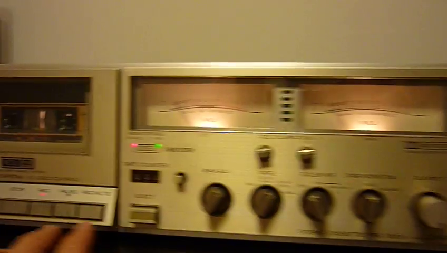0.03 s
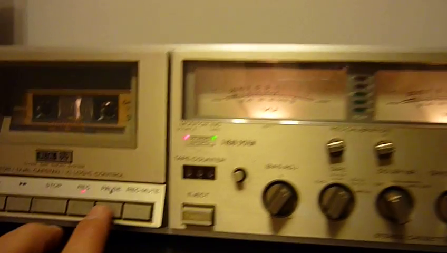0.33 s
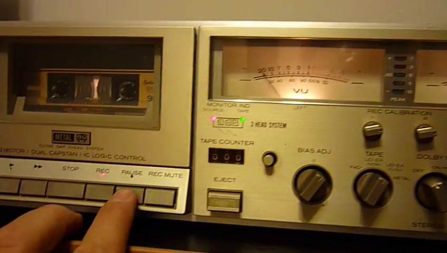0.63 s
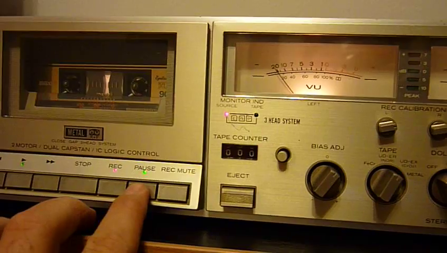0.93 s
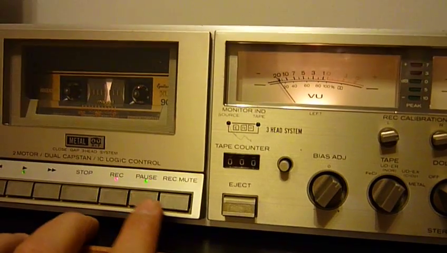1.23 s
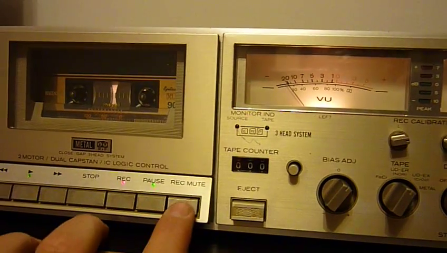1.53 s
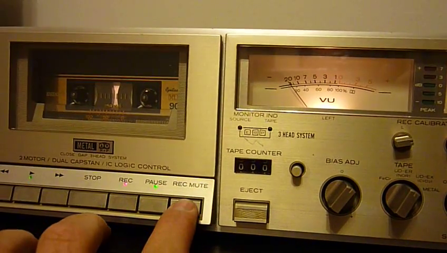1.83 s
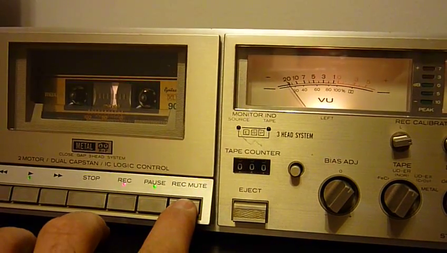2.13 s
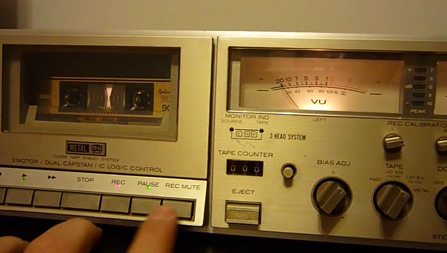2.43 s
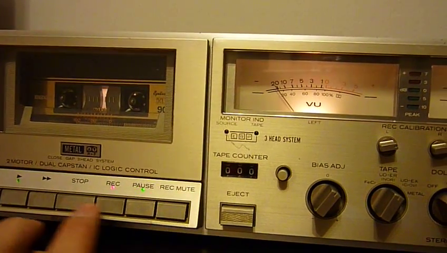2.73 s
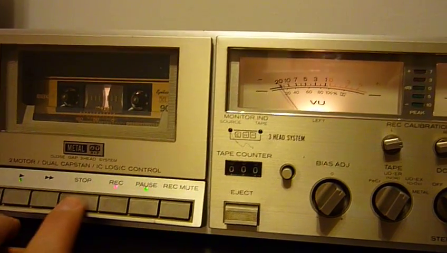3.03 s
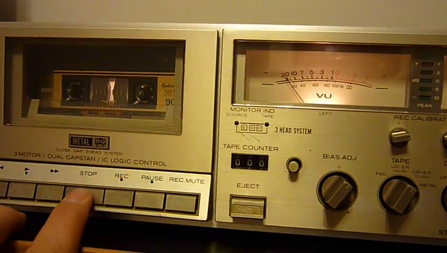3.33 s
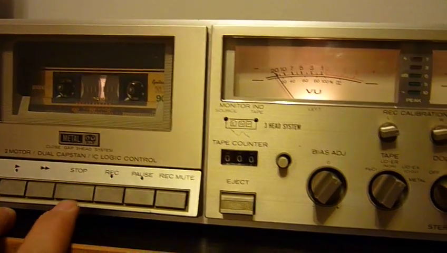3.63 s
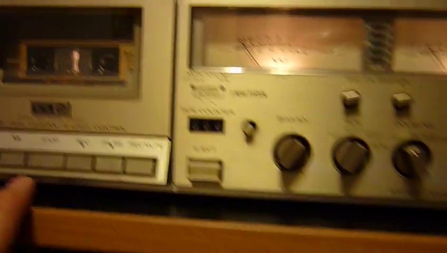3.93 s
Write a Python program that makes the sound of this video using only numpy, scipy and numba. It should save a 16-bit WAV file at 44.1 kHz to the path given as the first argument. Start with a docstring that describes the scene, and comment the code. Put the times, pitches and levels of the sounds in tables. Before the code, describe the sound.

A tape deck clunks into action, then its buttons click over a low hum and hiss.

```python
"""A cassette deck in a small room, close to a pocket camera; its motor hums over steady hiss throughout.
At 0.66 s a button clicks and fires the solenoid: levers rattle the chassis, a steel latch snaps home.
The camera's gain sinks after this clunk and creeps back.
From 1.1 s to 3.6 s further presses only click, each a switch spring and a plastic key."""
import sys
import numpy as np
from scipy import signal
from scipy.fft import rfft, irfft
from scipy.io import wavfile
from numba import njit

SR = 44100
rng = np.random.default_rng(int(sys.argv[2]) if len(sys.argv) > 2 else 0)


def waveform_to_disk(signal):
    """Save audio, clipped to [-1, 1], as 16-bit WAV at the path in sys.argv[1]."""
    frames = np.transpose(np.atleast_2d(signal))
    scaled = np.clip(frames, -1, 1) * 32767
    samples = np.round(scaled).astype(np.int16)
    wavfile.write(sys.argv[1], SR, samples)


N = 176400


def transport():
    """The solenoid's clunk: levers strike, the chassis rings on, the latch snaps."""
    blows = levers()
    return blows + chassis(blows) + latch()


def levers():
    """Each lever lands in a burst of tiny contacts: low thud, mid clack, grainy rattle."""
    # Each row: start in seconds, thud, clack and rattle levels in dB, rise and base decay in seconds.
    strikes = [(0.772, -45.5, -44, -43.5, .0005, 0.0073), (0.7904, -34.5, -23, -22.5, 0.0023, 0.0047),
               (0.7992, -43, -22.5, -20.5, 0.0015, .005), (0.8454, -34, -27.5, -26.5, 0.0064, 0.0053),
               (0.861, -42, -27, -36, .002, .011), (0.8811, -38, -24, -34.5, 0.0047, .006),
               (0.8955, -41.5, -46.5, -41.5, .002, 0.013), (0.9419, -43.5, -26, -22.5, 0.0028, 0.0093),
               (0.9578, -43, -22, -22.5, 0.00052, 0.0052)]
    grain = amp(2.5 * walk(rate_hz=660))
    grain /= np.sqrt(np.mean(grain ** 2))
    thud = band(low_hz=333, high_hz=605)
    # Each row: centre in Hz, width in Hz, relative level in dB.
    lever_resonances = [(534, 260, -6), (897, 280, -3.5), (1250, 260, 4.5), (1550, 450, -1), (2180, 340, 0)]
    clack = resonant_noise(lever_resonances)
    rattle = band(low_hz=2730, high_hz=5370) * grain
    out = np.zeros(N)
    for start_s, thud_db, clack_db, rattle_db, rise_s, decay_s in strikes:
        out += amp(thud_db) * thud * burst(start_s, rise_s, 2.33 * decay_s)
        out += (amp(clack_db) * clack + amp(rattle_db) * rattle) * burst(start_s, rise_s, decay_s)
    return out


def chassis(blows):
    """Sheet metal rings under the blows; higher modes die sooner."""
    # One entry per mode: pitch in Hz; relative level in dB.
    modes_hz = [329, 361, 398, 438, 779, 875, 967, 1058, 1181, 1305, 1409, 2130, 3308, 3926]
    modes_db = [-2, -1.5, -0.5, 2.5, -4, -5.5, -1.5, -4.5, -6, -6, -6, -6.5, 0, -10.5]
    t60_at_1khz_s = 0.19
    modes = [(hz, db, t60_at_1khz_s * (1000 / hz) ** 0.45) for hz, db in zip(modes_hz, modes_db)]
    return amp(-49) * signal.fftconvolve(blows, ring(modes))[:N]


def latch():
    """The steel latch snaps home with a bright ring."""
    # Each row: pitch in Hz, relative level in dB, T60 in seconds.
    steel_modes = [(5640, 3.5, 0.0094), (6200, -12, 0.0021), (5880, -27.5, 0.11)]
    return amp(-4.5) * snap(start_s=0.8054, modes=steel_modes, rise_s=0.00021)


def buttons():
    """The switch spring snaps; the plastic key cracks and knocks in its case."""
    # Each row: start in seconds, snap level in dB, snap pitch in Hz, crack and knock levels in dB,
    # base decay in seconds.
    clicks = [(0.657, -33, 2720, -47, -54, 0.0053), (1.1040, -24.5, 5430, -27, -38.5, 0.0028),
              (1.8147, -48, 5800, -48, -54, 0.0037), (2.442, -44, 4400, -48.5, -40.5, .006),
              (2.6514, -28, 3900, -32.5, -35, 0.0051), (2.7642, -44, 6100, -39, -52, 0.0041),
              (2.7689, -15, 3560, -23, -39, 0.0029), (3.1526, -32, 5330, -37, -38, 0.0024),
              (3.3226, -37.5, 6560, -45, -58, 0.0034), (3.632, -46, 3400, -51.5, -49, .005)]
    # Key resonances. Each row: centre in Hz, width in Hz, relative level in dB.
    key_shell = [(3680, 1100, 2), (5250, 1600, 0), (6850, 900, -9)]
    key_body = [(1100, 420, 1.5), (1560, 130, -1), (2090, 370, -0.5), (2570, 320, -0.5)]
    crack, knock = resonant_noise(key_shell), resonant_noise(key_body)
    spring_t60_s = 0.0068
    out = np.zeros(N)
    for start_s, snap_db, snap_hz, crack_db, knock_db, decay_s in clicks:
        out += snap(start_s, [(snap_hz, snap_db, spring_t60_s)], rise_s=0.00033)
        out += amp(crack_db) * crack * burst(start_s, rise_s=0.0002, decay_s=decay_s)
        out += amp(knock_db) * knock * burst(start_s, rise_s=0.0027, decay_s=1.44 * decay_s)
    return out


def room(x):
    """Short diffuse tail of a small room."""
    t60_s = 0.32
    tail = rng.standard_normal(N) * burst(start_s=0.0013, rise_s=0.0013, decay_s=t60_s / np.log(1000))
    return signal.fftconvolve(x, tail / np.linalg.norm(tail))[:N]


def motor():
    """Motor and flywheel lines drift together with speed and waver singly, over faint mains hum."""
    # One entry per hum line: pitch in Hz; relative level in dB.
    lines_hz = [132, 210.6, 250.4, 292.1, 501.3, 537.7, 584.3, 778.9, 835.3, 1001.6, 1168.8, 1363, 2778,
                3459, 3682]
    lines_db = [-66.5, -64, -66, -53, -68, -73.5, -60.5, -63.5, -63.5, -65, -68, -70.5, -72, -79.5, -79.5]
    boost_db, waver_db, mains_hz = 3, 0.1, 123
    speed = 1 + 0.001034 * walk(rate_hz=2.73)
    clock_s = np.cumsum(speed) / SR
    hum = amp(-63) * np.sin(2 * np.pi * mains_hz * np.arange(N) / SR)
    for hz, db in zip(lines_hz, lines_db):
        gain = amp(db + boost_db - waver_db * walk(rate_hz=5.5))
        hum += gain * np.sin(2 * np.pi * (hz * clock_s + rng.random()))
    return hum


def hiss():
    """Steady room and microphone noise."""
    # Each row: frequency in Hz, relative spectral density in dB.
    spectrum = [(40, -14.5), (90, -15.5), (125, -6.5), (240, -3), (420, -4.5), (850, -7), (1800, -13),
                (2400, -14), (2800, -12.5), (3600, -16.5), (4800, -19), (7400, -24)]
    hz, db = np.array(spectrum).T
    floor = noise(lambda f: amp(np.interp(np.log(f), np.log(hz), db)))
    return floor * amp(-49.5 - 0.19 * walk(rate_hz=8.5))


def snap(start_s, modes, rise_s):
    """A small stiff part springs over and rings."""
    x = ring(modes)
    x *= np.minimum(np.arange(len(x)) / SR / rise_s, 1)
    return np.pad(x, (int(start_s * SR), N))[:N]


def ring(modes):
    """Decaying sines after a tap."""
    t = np.arange(SR // 2) / SR
    return sum(amp(db) * np.sin(2 * np.pi * hz * t) * np.exp(-np.log(1000) * t / t60_s)
               for hz, db, t60_s in modes)


def burst(start_s, rise_s, decay_s):
    """Envelope: linear rise, exponential decay."""
    age_s = np.arange(N) / SR - start_s
    return np.clip(age_s / rise_s, 0, 1) * np.exp(-np.clip((age_s - rise_s) / decay_s, 0, 20))


def resonant_noise(peaks):
    """Noise ringing in a few broad resonances."""
    return noise(lambda f: np.sqrt(sum(amp(db) ** 2 / (1 + (2 * (f - hz) / width_hz) ** 2) ** 1.5
                                       for hz, width_hz, db in peaks)))


def band(low_hz, high_hz):
    """Band-limited noise."""
    return noise(lambda f: 1 / np.sqrt((1 + (low_hz / f) ** 8) * (1 + (f / high_hz) ** 8)))


def walk(rate_hz):
    """Random wander below rate_hz, standard deviation 1."""
    return noise(lambda f: 1 / (1 + (f / rate_hz) ** 4))


def noise(colour):
    """Noise shaped by the gain curve colour(Hz), standard deviation 1."""
    hz = np.maximum(np.fft.rfftfreq(N, 1 / SR), 1)
    x = irfft(rfft(rng.standard_normal(N)) * colour(hz), N)
    return x / x.std()


def amp(db):
    """Decibels to gain."""
    return 10 ** (np.asarray(db) / 20)


@njit
def follow(x, attack_s, release_s):
    """Level follower with separate rise and fall times."""
    out, level = np.empty(len(x)), 0.
    for i in range(len(x)):
        lag_s = attack_s if x[i] > level else release_s
        level += (x[i] - level) / (lag_s * SR)
        out[i] = level
    return out


def scene():
    """Deck, room and background, in mono."""
    clunk, clicks = transport(), buttons()
    echo = room(amp(-10) * clunk + amp(-8.5) * clicks)
    return (clunk + clicks + echo + motor() + hiss())[None]


def record(dry):
    """The camera turns its gain down after loud sounds, cuts the top and sits slightly off zero."""
    knee_db, slope, dc_offset = -42.5, 0.19, -0.0418
    level = follow(np.abs(dry[0]), attack_s=0.047, release_s=0.86)
    gain = np.maximum(level / amp(knee_db), 1) ** -slope
    mic_rolloff_hz, top_hz = 7490, 8600
    mic_rolloff = signal.butter(12, mic_rolloff_hz, fs=SR, output="sos")
    top_cut = signal.ellip(8, 0.2, 80, top_hz, fs=SR, output="sos")
    dull = signal.sosfilt(mic_rolloff, dry * gain)
    return signal.sosfilt(top_cut, dull) + dc_offset


dry = scene()
out = record(dry)
waveform_to_disk(out)
```